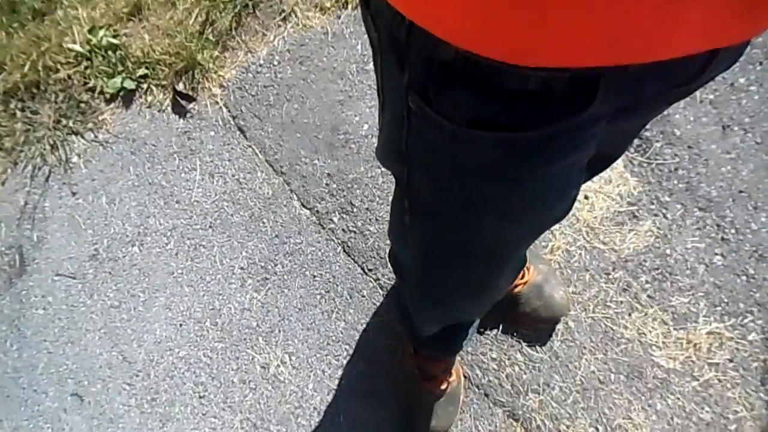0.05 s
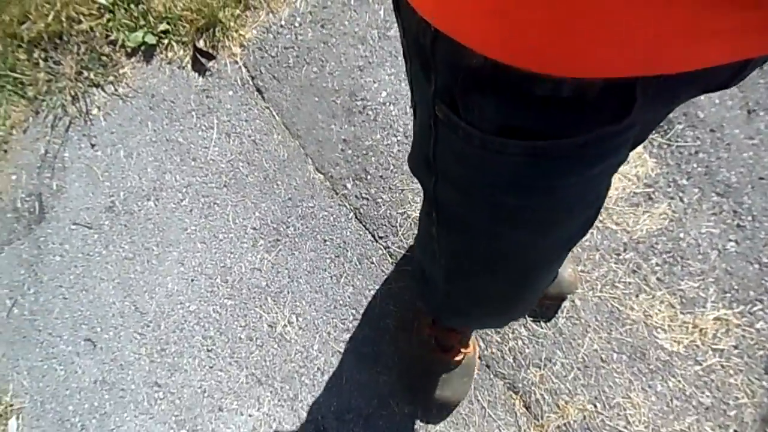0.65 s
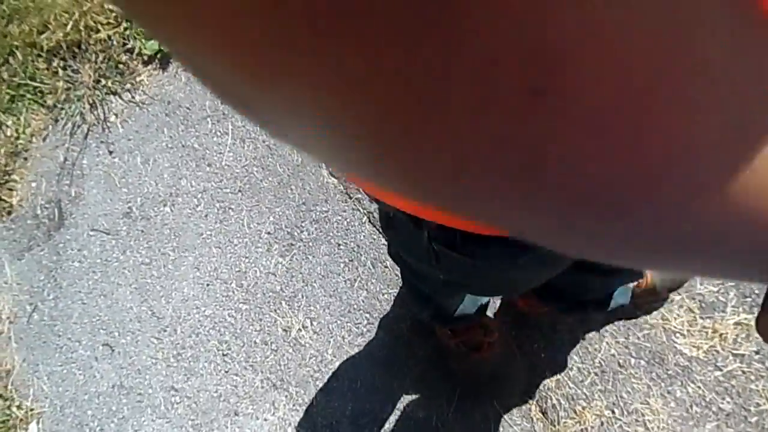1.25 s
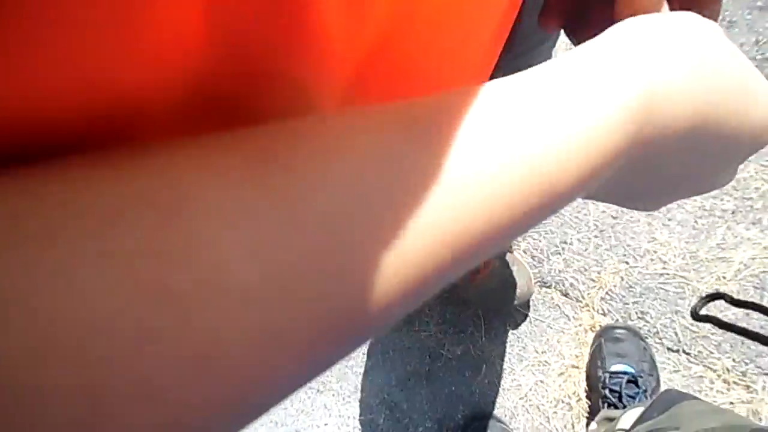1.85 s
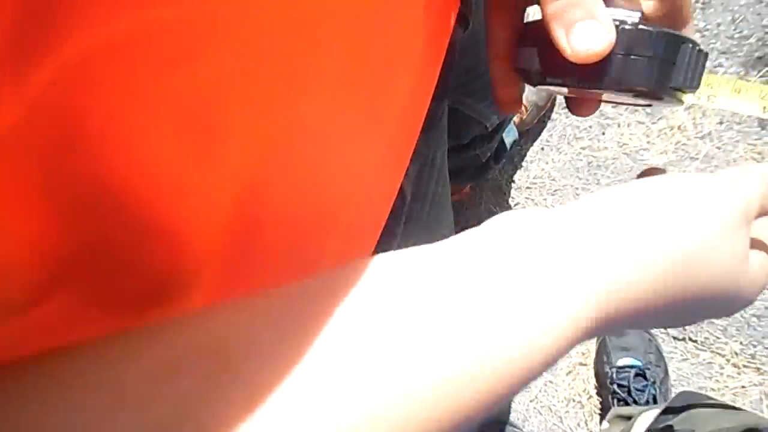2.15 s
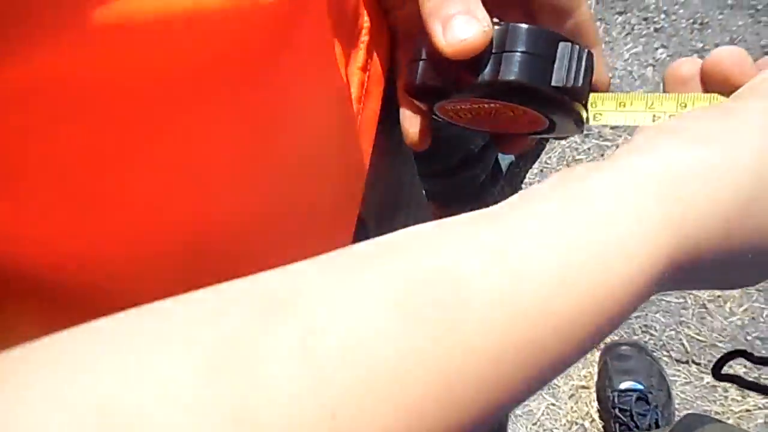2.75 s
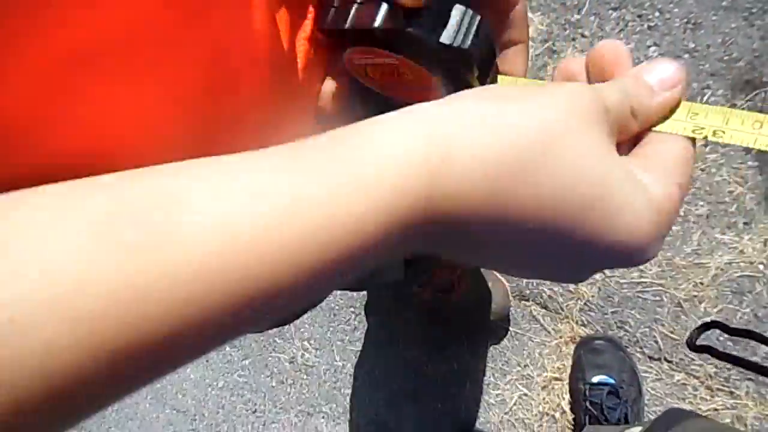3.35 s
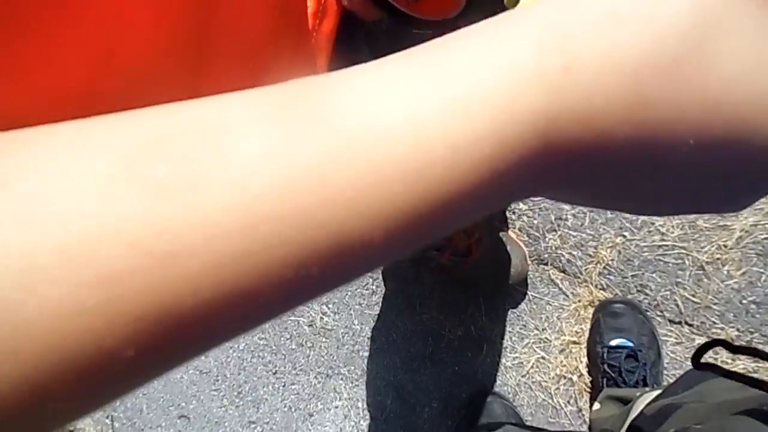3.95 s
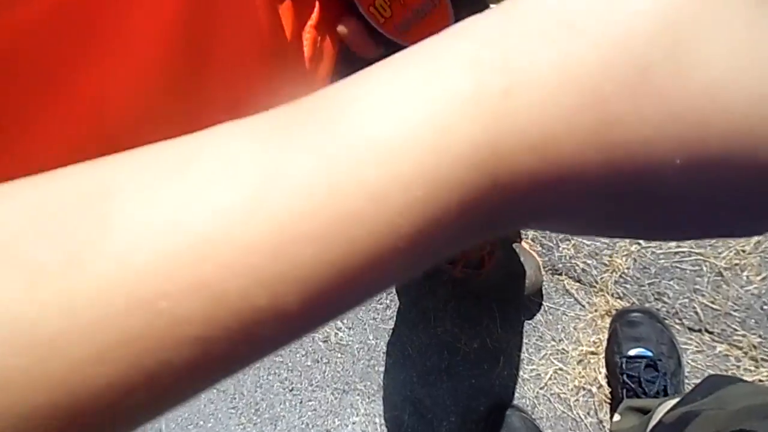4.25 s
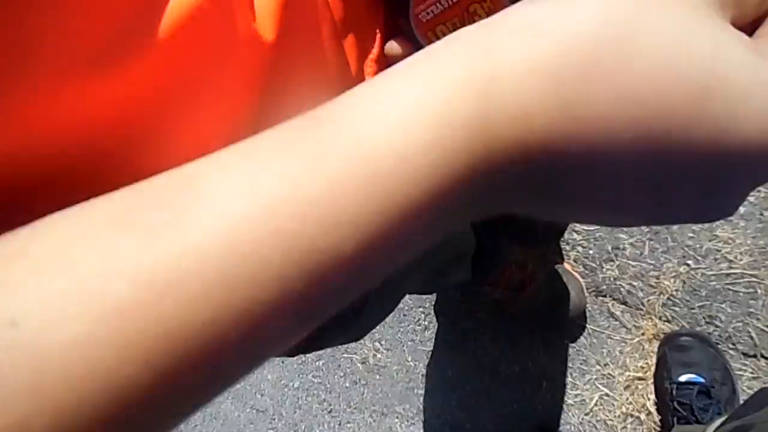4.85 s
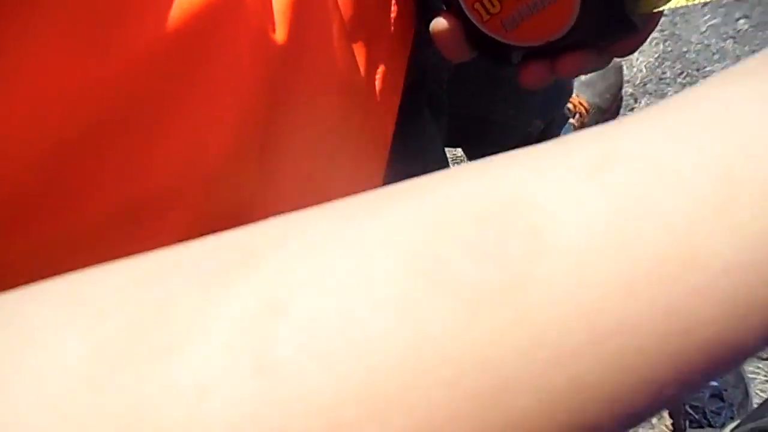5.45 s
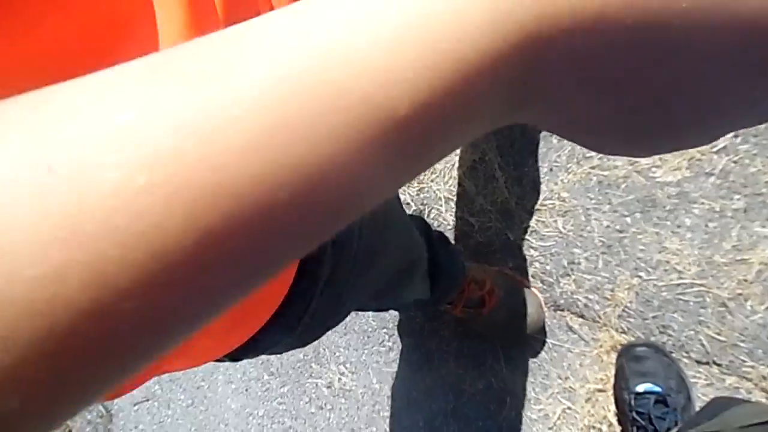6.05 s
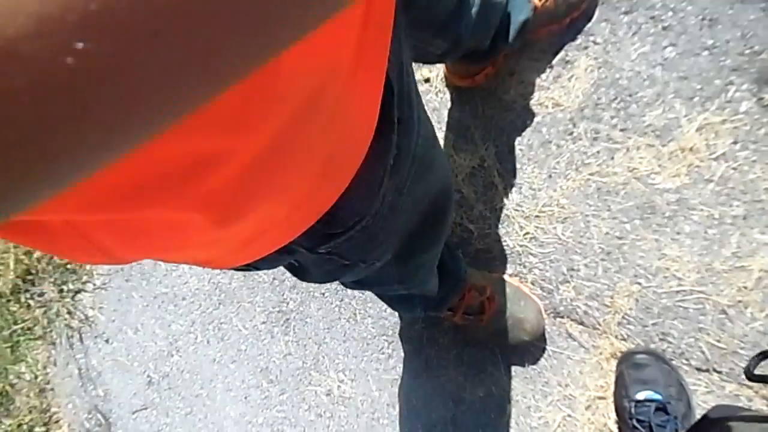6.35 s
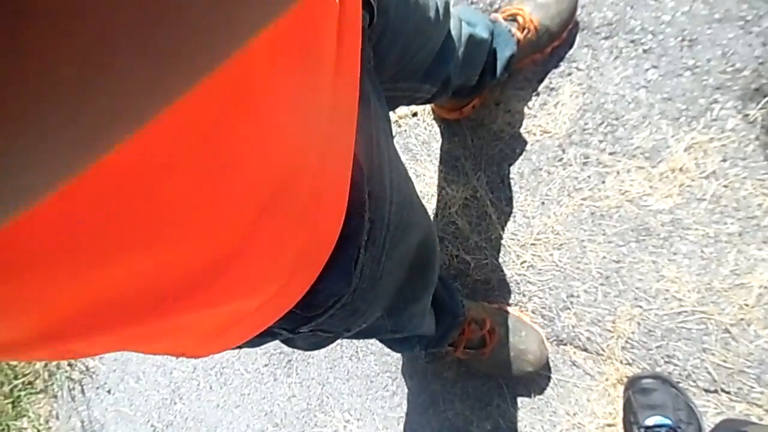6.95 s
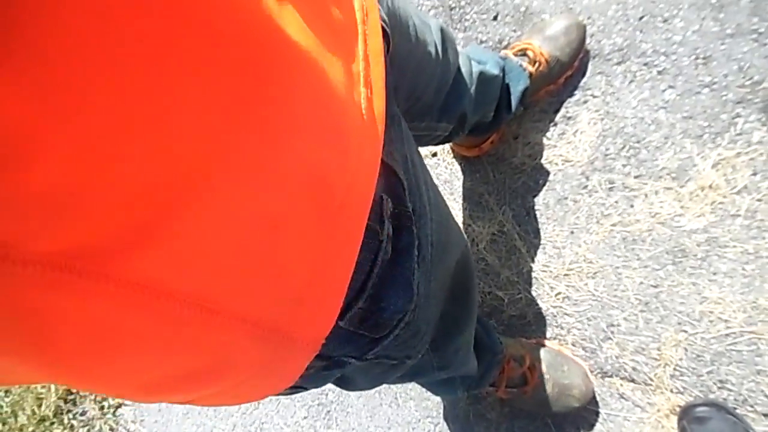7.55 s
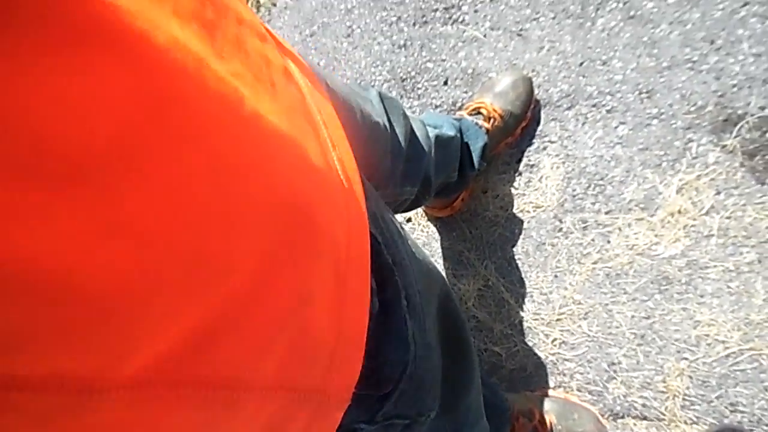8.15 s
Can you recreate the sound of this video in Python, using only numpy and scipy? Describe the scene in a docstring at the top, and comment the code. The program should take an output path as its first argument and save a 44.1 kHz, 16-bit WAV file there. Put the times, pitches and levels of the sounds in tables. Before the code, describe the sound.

A steel tape measure scrapes, rattles and clacks close by, with clothing rubbing the microphone and faint insects outdoors.

```python
"""A steel tape measure is pulled out in a summer garden, close to a body-worn microphone.
Katydids and a cricket rub their wings over a far machine hum. From 0.4 s the blade slides in
stick-slip strokes, scraping, ringing and crinkling; soon clothing rubs the microphone, a breeze
buffets it and its housing thuds. From 1.4 s the blade clacks against its case, in bouts to the end.
Near 6.5 s and 7 s a far bird whistles."""
import sys
import numpy as np
from scipy import signal
from scipy.fft import rfft, irfft
from scipy.io import wavfile

SR = 44100
rng = np.random.default_rng(int(sys.argv[2]) if len(sys.argv) > 2 else 0)


def inscribe(sig):
    """Save sig as 16-bit PCM at rate SR to the path in sys.argv[1].

    A 1-D sig is mono; a 2-D sig holds one channel per row.
    Samples are clipped to [-1, 1] before scaling.
    """
    pcm = np.round(np.clip(np.atleast_2d(sig).T, -1, 1) * 32767)
    wavfile.write(sys.argv[1], SR, pcm.astype(np.int16))


N = 362061
TIME = np.arange(N) / SR


def undb(db):
    """Decibels to gain."""
    return np.exp(np.asarray(db) * (np.log(10) / 20))


def unit(x):
    """Scale to rms 1."""
    return x / np.sqrt(np.mean(x ** 2) + 1e-20)


def add(out, time_s, x):
    """Mix x in at time_s."""
    i = int(np.clip(time_s * SR, 0, N))
    out[i:i + len(x)] += x[:N - i]


def response(colour, size=1024):
    """Minimum-phase, unit-energy impulse response from (frequency [Hz], level [dB]) rows."""
    hz, db = np.transpose(colour)
    bins_hz = np.maximum(np.arange(size // 2 + 1) * SR / size, 1)
    cepstrum = irfft(np.log(undb(np.interp(np.log(bins_hz), np.log(hz), db))))
    cepstrum[1:size // 2] *= 2
    cepstrum[size // 2 + 1:] = 0
    h = irfft(np.exp(rfft(cepstrum)))
    return h / np.linalg.norm(h)


def ring(x, h):
    """Drive a body of impulse response h with x."""
    return signal.oaconvolve(x, h)[:len(x)]


def band(x, hz, kind):
    """Butterworth low-, band- or high-pass."""
    return signal.sosfilt(signal.butter(4, hz, kind, fs=SR, output="sos"), x)


def noise(colour):
    """Steady coloured noise, rms 1."""
    return unit(ring(rng.standard_normal(N), response(colour, size=8192)))


def walk(rate_hz):
    """Smooth random wander, spread near 1."""
    return np.interp(TIME * min(rate_hz, 900), np.arange(8192), rng.standard_normal(8192))


def phase_of(hz):
    """Running phase [rad] of a varying frequency."""
    return 2 * np.pi * np.cumsum(hz) / SR


def slips(rate_hz, spread_db):
    """Stick-slip impulses: many weak, a few strong."""
    fired = rng.random(N) < rate_hz / SR
    size = undb(spread_db * np.minimum(rng.exponential(size=N), 4))
    return unit(fired * size * rng.choice([-1, 1], N))


def swell(peak_s, length_s, rise=.47, roundness=1.7):
    """Envelope of one movement: rounded peak, steep ends."""
    u = (TIME - peak_s) / length_s
    away = np.minimum(np.maximum(-u / rise, u / (1 - rise)), 2)
    return undb(-20 * away ** roundness - 2 * away ** 10)


def movements(rows, column=2):
    """Power sum of a table's swells, levels from one dB column."""
    return np.sqrt(sum((undb(row[column]) * swell(row[0], row[1])) ** 2 for row in rows))


# open-air spectrum: (frequency [Hz], level [dB])
AIR_COLOUR = [(30, 10), (100, 0.5), (190, -7.5), (400, -4.5), (520, -3), (780, -12), (1100, -11.5),
              (2000, -17.5), (5000, -14), (9500, -15), (15000, -28.5)]
def air(level_db=-5):
    """Open air: broad noise, slowly wavering."""
    return undb(level_db + walk(6)) * noise(AIR_COLOUR)


# distant insect band: (low edge [Hz], high edge [Hz])
CHORUS_BAND_HZ = [6370, 8240]
def chorus(level_db=-4):
    """Distant insects blur into a flickering hiss."""
    return undb(level_db + 1.4 * walk(100)) * unit(band(rng.standard_normal(N), CHORUS_BAND_HZ, "bandpass"))


def katydid(start_hz=8100, end_hz=6100, stroke_s=.022, cycle_s=.11, snap=.76):
    """Wing strokes in uneven threes; each falls in pitch and peaks near its end."""
    rasp_hz = 260 * walk(900)
    out, u = np.zeros(N), np.arange(0, 1, 1 / (stroke_s * SR))
    shape = np.sqrt(np.sin(np.pi * u)) * (1 - snap + snap * np.exp(-((u - .88) / .054) ** 2))
    starts_s = (np.arange(84)[:, None] + [0, .42, .76]).ravel() * cycle_s
    for time_s, (late, sharp, loud) in zip(starts_s, rng.standard_normal((len(starts_s), 3))):
        hz = (start_hz + (end_hz - start_hz) * u) * (1 + .007 * sharp)
        hz += rasp_hz[int(time_s * SR) % (N // 2):][:len(u)]
        add(out, time_s + .0024 * late, undb(2 * loud) * shape * np.sin(phase_of(hz)))
    return unit(out)


def hum(hz=123.3, level_db=-15):
    """A far machine drones: wavering fundamental plus third harmonic."""
    phase = phase_of(hz * (1 + walk(10) / 100))
    return undb(level_db + 2 * walk(10)) * (np.sin(phase) + .5 * np.sin(3 * phase))


# dry ticks of case and blade: (time [s], level [dB], pitch [Hz])
CREAKS = [(0.012, -40.5, 4000), (.045, -39, 3970), (1.266, -30.5, 5240), (2.592, -20.5, 6540),
          (2.879, -28, 7200), (3.076, -39, 4500), (3.188, -37, 2720), (3.269, -42, 4500),
          (3.466, -40, 3010), (3.643, -31.5, 6070), (3.711, -34.5, 8500), (4.916, -26, 5500),
          (5.192, -40.5, 5540), (5.293, -47, 4200), (5.757, -34, 2590), (5.766, -24.5, 2750),
          (5.859, -31, 2800), (6.525, -46.5, 2450), (7.127, -36.5, 3960), (7.151, -27.5, 9450)]
def creaks(decay_cycles=6):
    """Case and blade creak in the hand: a contact slips once and rings briefly."""
    out, t = np.zeros(N), TIME[:1024]
    for time_s, level_db, hz in CREAKS:
        body = response([(hz / 6, -16), (hz / 2, -9), (hz, 0), (hz * 2, -11), (hz * 5, -28)])
        fade = np.exp(-t * hz / decay_cycles)
        tick = ring(fade * rng.standard_normal(len(t)), body)
        add(out, time_s, undb(level_db) * 2 * tick * np.linalg.norm(fade) / np.linalg.norm(tick))
    return out


# cricket pace: (start [s], chirp period [s])
CRICKET_PACE = [(.19, .222), (2.6, .251), (4.3, .226), (5.45, .262), (6.25, .229)]
def cricket(hz=8650, waver_hz=120, pulse_hz=135, chirp_s=.06):
    """Eight-pulse chirps on one high note, about four a second."""
    gate, t = np.zeros(N), TIME[:int(chirp_s * SR)]
    chirp = np.sqrt(np.sin(np.pi * t / chirp_s)) * np.sin(np.pi * pulse_hz * t) ** 2
    time_s = CRICKET_PACE[0][0]
    while time_s < N / SR:
        add(gate, time_s, undb(rng.standard_normal()) * chirp)
        time_s += [period_s for start_s, period_s in CRICKET_PACE if start_s <= time_s][-1]
    return gate * np.sin(phase_of(hz + waver_hz * walk(480)))


# blade strokes: (peak time [s], length [s], flex level [dB], edge level [dB])
BLADE_STROKES = [(.515, 0.22, -60.5, -55), (.76, 0.27, -61, -62), (1.08, 0.39, -46, -45.5),
                 (1.28, 0.73, -42, -38), (1.465, 0.078, -25, -26.5), (1.52, 0.19, -38, -34),
                 (1.74, 0.19, -41.5, -63), (1.83, 0.18, -47.5, -32), (1.95, 0.044, -51, -34.5),
                 (2.3, 0.1, -43.5, -36), (2.49, 0.091, -39, -35), (2.615, 0.13, -33.5, -31),
                 (2.89, 0.11, -36.5, -29), (3.24, 0.17, -41.5, -37.5), (3.372, 0.046, -24, -37),
                 (3.53, 0.21, -46, -43), (3.76, 0.024, -56, -41), (4.66, 0.22, -49, -55),
                 (4.88, 0.11, -33, -42), (4.981, 0.058, -48, -41), (5.18, 0.15, -56, -61),
                 (5.41, 0.2, -41.5, -43), (5.665, 0.19, -32, -35), (5.713, 0.029, -34, -26.5),
                 (5.895, 0.089, -31, -50), (6.005, 0.045, -35.5, -30), (6.13, 0.048, -49.5, -50.5),
                 (6.82, 0.15, -56, -50.5), (7.03, 0.083, -85, -47), (7.16, 0.086, -39, -41),
                 (7.3, 0.28, -28, -40), (7.41, 0.12, -53, -26), (7.51, 0.32, -41, -36.5),
                 (7.66, 0.41, -54, -43), (8.01, 0.47, -40.5, -42), (8.13, 0.033, -26, -14.5),
                 (8.166, 0.087, -34.5, -29)]
def blade_motion(column, quiver_db=-25):
    """Blade drive envelope: strokes plus the quiver after each clack."""
    power = movements(BLADE_STROKES, column) ** 2
    for row in CASE_CLACKS:
        quiver = np.exp(-np.log(1000) * TIME[:SR // 2] / grip_t60(row[0]))
        add(power, row[0], (undb(row[column] + quiver_db) * quiver) ** 2)
    return np.sqrt(power)


# clusters of close blade modes: (centre [Hz], width [Hz], level [dB])
BLADE_MODES = [(3380, 520, -2.5), (3670, 310, -8), (5910, 3800, -2), (8630, 1800, 2.5)]
def steel(colour, tail_db, t60_s=.06, count=14):
    """Thin blade's impulse response: dry tick, then ringing; each bend shifts the colour."""
    t, bend = TIME[:SR // 8], rng.uniform(.93, 1.07)
    modes = np.zeros(len(t))
    for hz, width_hz, db in BLADE_MODES:
        partials_hz = hz + width_hz * rng.uniform(-.54, .5, (count, 1))
        modes += undb(db) * np.sin(2 * np.pi * (partials_hz * t + rng.random((count, 1)))).sum(axis=0)
    modes *= np.exp(-np.log(1000) * t / t60_s)
    h = undb(tail_db) * modes / np.linalg.norm(modes)
    h[0] += 1
    return ring(h, response([(hz * bend, db) for hz, db in colour]))


# friction unevenness: (time [s], spread [dB])
FRICTION_SPREAD = [(1.9, 1.9), (2.5, 3.1)]
def jerkiness():
    """Friction spread [dB]: the blade first glides, then catches."""
    return np.interp(TIME, *np.transpose(FRICTION_SPREAD))


def reflections(x, count=3, hold_s=.04, longest_s=.004, echo_gain=.4):
    """Slips echo along the blade off fingers and case; delays change as the hand shifts."""
    out, hop, size = np.zeros(N), int(hold_s * SR), int(longest_s * SR)
    window = np.sin(np.pi * np.arange(2 * hop) / (2 * hop))
    for i in range(0, N, hop):
        h = np.zeros(size)
        h[0] = 1
        h[rng.integers(10, size, count)] = echo_gain * rng.choice([-1, 1], count)
        piece = x[i:i + 2 * hop]
        add(out, i / SR, signal.fftconvolve(piece * window[:len(piece)], h))
    return unit(out)


# sliding blade spectrum: (frequency [Hz], level [dB])
SCRAPE_COLOUR = [(500, -21.5), (1400, -18.5), (2300, -16.5), (3200, -12), (4600, -11), (6000, -12),
                 (8000, -1), (9500, 1.5), (11000, -3), (13000, -8.5), (15500, -13)]
def scrape(flex, edge, edge_db=-2, split_hz=6300):
    """The blade jerks through case mouth and fingers; each slip rings it."""
    jerk_db = jerkiness()
    friction = slips(rate_hz=2500, spread_db=4.5) * undb(jerk_db * walk(110))
    # the wandering contact point favours different bands
    bounds_hz = np.geomspace(900, 16500, 13)
    drifts = [undb(2.5 * walk(14)) for _ in bounds_hz[1:]]
    friction = sum(band(friction, [lo, hi], "bandpass") * drift * undb(jerk_db * walk(130))
                   for lo, hi, drift in zip(bounds_hz, bounds_hz[1:], drifts))
    friction = reflections(friction)
    drive = flex * unit(band(friction, split_hz, "lowpass"))
    drive += undb(edge_db) * edge * unit(band(friction, split_hz, "highpass"))
    out, hold = np.zeros(N), SR // 4
    for i in range(0, N, hold):  # the close modes change with the grip
        add(out, i / SR, signal.fftconvolve(drive[i:i + hold], steel(SCRAPE_COLOUR, tail_db=-17.5)))
    return out


# grips, each freeing another blade length: (start [s], pitch [Hz], level re flex [dB], t60 [s])
BLADE_GRIPS = [(0, 2953, 8, .2), (.68, 3867, -6, 0.14), (5.55, 3130, -8, 0.14), (7.45, 3735, -3.5, 0.26)]
# free blade's bending modes: (pitch multiple [-], level [dB])
BENDING_MODES = [(.63, -16), (1, -5), (1.44, -9.5)]
def singing(flex, width_hz=170, rough_db=2, wander=.022):
    """Slips keep the bending modes ringing, fitfully and at wavering pitch."""
    fade, out = np.exp(-np.pi * width_hz * TIME[:SR // 16]), 0
    start_s, hz, grip_db, _ = np.transpose(BLADE_GRIPS)
    grip = np.maximum(np.searchsorted(start_s, TIME) - 1, 0)
    for ratio, db in BENDING_MODES:
        phase = phase_of(ratio * hz[grip] * (1 + wander * walk(20)))
        mode = sum(ring(slips(rate_hz=1100, spread_db=1.5), fade) * wave(phase)
                   for wave in (np.sin, np.cos))
        out += undb(db) * unit(mode * undb(rough_db * walk(20)))
    return out * undb(grip_db[grip]) * flex


def grip_t60(time_s):
    """Ring time [s] that the current grip allows."""
    return [t60_s for start_s, _, _, t60_s in BLADE_GRIPS if start_s <= time_s][-1]


def crinkles(flex, edge, rate_hz=150, decay_s=.001, grit=.12, gain=2.506):
    """The moving curved blade snaps in tiny buckles, each at its own pitch."""
    out, t = np.zeros(N), TIME[:600]
    for when, height, size, offset in rng.random((int(rate_hz * N / SR), 4)):
        hz, i = 2900 * 4 ** height, int(when * N)
        motion = flex[i] ** (1 - height) * edge[i] ** height
        cycles = hz * t + offset + grit * np.cumsum(rng.standard_normal(len(t)))
        add(out, i / SR, size ** 2 * motion * np.exp(-t / decay_s) * np.sin(2 * np.pi * cycles))
    return gain * band(out, 1800, "highpass") * jerkiness()


# microphone housing spectrum: (frequency [Hz], level [dB])
HOUSING_COLOUR = [(90, -5), (380, 3.5), (1050, -6), (1600, -16.5), (3000, -31.5)]
# cloth rubs: (peak time [s], length [s], swish level [dB], hollow level [dB])
CLOTH_RUBS = [(.795, 0.047, -60, -55.5), (1.36, 0.55, -46, -47), (4.87, 0.15, -47, -45.5),
              (5.68, 0.19, -48.5, -46), (5.9, 0.34, -51, -53.5), (7.31, 0.39, -45, -43.5)]
def clothing(hollow_hz=740, width_hz=150, wander=.13, jerk_db=3):
    """Cloth swishes over the housing and rings its hollow, shifting the note as it covers it."""
    friction = slips(rate_hz=2000, spread_db=2) * undb(jerk_db * walk(70))
    swish = unit(ring(friction, response(HOUSING_COLOUR)))
    carrier = np.exp(1j * phase_of(hollow_hz * np.exp(wander * walk(40))))
    fade = np.exp(-np.pi * width_hz * TIME[:SR // 10])
    hollow = unit(np.real(ring(friction * carrier.conj(), fade) * carrier))  # moving resonance
    return swish * movements(CLOTH_RUBS) + hollow * movements(CLOTH_RUBS, column=3)


# wind buffet spectrum: (frequency [Hz], level [dB])
BUFFET_COLOUR = [(12, -5), (25, 4.5), (55, -5), (100, -19), (200, -35), (600, -56.5)]
# puffs of air: (peak time [s], length [s], level [dB])
PUFFS = [(1.29, 0.69, -35.5), (2.65, 0.56, -40), (3.42, 0.6, -37.5), (6.27, 0.65, -52), (7.37, 0.52, -36)]
def breeze(calm_db=-73):
    """Air buffets the microphone: low puffs over a faint draught."""
    flutter = undb(4 * walk(16))
    return unit(noise(BUFFET_COLOUR) * flutter) * (movements(PUFFS) + undb(calm_db))


# housing thuds: (time [s], pitch [Hz], level [dB])
HOUSING_BUMPS = [(1.181, 408, -31), (1.298, 690, -29), (1.419, 734, -35.5), (1.474, 765, -31),
                 (4.874, 713, -28.5), (5.700, 700, -27), (5.721, 745, -28), (5.842, 470, -36.5),
                 (5.894, 520, -32), (7.254, 743, -27.5), (7.425, 697, -28.5)]
def bumps(note_db=-3.5, knock_db=-6, decay_s=.0033, sag_per_s=8):
    """The housing thuds: a dull knock with a short sagging note."""
    out, t = np.zeros(N), TIME[:SR // 16]
    contact = t / decay_s * np.exp(1 - t / decay_s)
    for time_s, hz, level_db in HOUSING_BUMPS:
        body = response([(hz / 4, -10), (hz, 0), (hz * 2, -10), (hz * 6, -40)])
        knock = undb(knock_db) * unit(ring(rng.standard_normal(len(t)), body))
        note = undb(note_db) * np.sin(phase_of(hz * np.exp(-sag_per_s * (t - decay_s))))
        add(out, time_s - decay_s / 2, undb(level_db) * contact * (note + knock))
    return out


# struck blade spectrum: (frequency [Hz], level [dB])
CLACK_COLOUR = [(150, -32.5), (700, -11), (1300, -18.5), (2200, -13.5), (3100, -5.5), (4000, -4),
                (5500, -4.5), (6800, -0.5), (8700, 10), (10200, 2), (11700, -0.5), (15500, -7.5)]
# blade hits case: (time [s], chatter [ms], flex level [dB], edge level [dB], main ring [Hz])
CASE_CLACKS = [(1.4423, 4.6, -19.5, -12.5, 2900), (1.717, 2.1, -26, -35, 2900),
               (1.7381, 0.48, -24.5, -50, 2620), (2.521, 2.9, -23, -24.5, 5050),
               (2.573, 3.3, -25, -29.5, 4260), (2.604, 1, -21, -33, 4130), (2.6254, 1.4, -24, -35, 6460),
               (2.852, 1.7, -26, -22, 6300), (2.935, 1.4, -15.5, -9, 4180), (2.96, 1.0, -41, -23, 5550),
               (3.035, 1.8, -28.5, -30, 5070), (3.229, 3.6, -27.5, -32.5, 4970),
               (3.368, 1.45, -17, -13, 5940), (3.43, 0.84, -26, -17.5, 6250),
               (3.9864, 0.58, -20, -26, 6200), (3.991, 3.3, -39.5, -26.5, 4080),
               (4.884, 0.94, -9.5, -15.5, 5680), (4.9039, 2.9, -4, -10, 5630),
               (5.6977, 1.25, -16, -25, 6100), (5.8337, 0.81, -11, -29.5, 5130),
               (5.9171, 0.31, -20, -19, 6100), (5.9345, 0.17, -6, -12.5, 5940),
               (5.9646, 1, -21, -24.5, 5700), (5.97, 1.06, -9.5, -9.5, 4600),
               (6.0034, 1, -26.5, -22.5, 6150), (7.348, 1.6, -33, -29, 5200), (7.3636, 1.1, -24, -25, 5350),
               (7.406, 4.1, -15.5, -12.5, 2630), (7.4265, 1.1, -14.5, -23, 2650),
               (8.0564, 4.4, -18, -15.5, 6060), (8.1142, 3.5, -10.5, -7, 5030)]
def clacks(graze_s=.0076, graze_db=-23.5, thud_db=-19, main_db=-5, main_width_hz=550):
    """The blade grazes the case, then chatters on it: case thud, bending, edges, one lasting mode."""
    low_hz, high_hz = 1800, 6500
    sing_hz, sing_db, flex_cap_db = 3800, -20, -24
    out, t = np.zeros(N), TIME[:SR // 4]
    graze = undb(graze_db) * (t < graze_s) * t / graze_s
    for time_s, chatter_ms, flex_db, edge_db, main_hz in CASE_CLACKS:
        u = np.maximum(t - graze_s, 0) / (max(chatter_ms, .2) / 1000)
        contact = np.sqrt(u) * np.exp((1 - u ** 2) / 4) + graze
        hit = ring(contact * rng.laplace(size=len(t)), steel(CLACK_COLOUR, tail_db=-17, count=30))
        main = ring(hit, np.exp(-np.pi * main_width_hz * t) * np.cos(2 * np.pi * main_hz * t))
        bending = unit(band(hit, [low_hz, high_hz], "bandpass"))
        bending += undb(main_db) * unit(band(main, [low_hz, high_hz], "bandpass"))
        thud, edges = band(hit, low_hz, "lowpass"), band(hit, high_hz, "highpass")
        for part, db in (thud, flex_db + thud_db), (bending, flex_db), (edges, edge_db):
            add(out, time_s - graze_s, undb(db) * np.linalg.norm(contact) * part / np.linalg.norm(part))
        sing = np.exp(-np.log(1000) * t / grip_t60(time_s)) * np.sin(2 * np.pi * sing_hz * t)
        add(out, time_s, undb(min(flex_db, flex_cap_db) + sing_db) * sing)
    return out


# far whistles: (time [s], length [s], start pitch [Hz], end pitch [Hz], level re garden [dB])
BIRD_WHISTLES = [(6.472, 0.2, 4590, 4450, -14), (6.955, 0.062, 4550, 3100, -6)]
def bird():
    """Thin wavering whistles, near level or falling."""
    out, waver_hz = np.zeros(N), 80 * walk(400)
    for time_s, length_s, start_hz, end_hz, db in BIRD_WHISTLES:
        u = np.arange(0, 1, 1 / (length_s * SR))
        hz = start_hz + (end_hz - start_hz) * u ** 1.4 + waver_hz[:len(u)]
        add(out, time_s, undb(db) * np.sqrt(np.sin(np.pi * u)) * np.sin(phase_of(hz)))
    return out * undb(2 * walk(90))


# outdoor background: (time [s], level [dB])
GARDEN_LEVEL = [(.3, -65), (.85, -59.5), (1.3, -46.5), (2.75, -38), (3.14, -44.5), (4.45, -58), (4.77, -46),
                (5.24, -59.5), (5.8, -42), (6.28, -68), (6.7, -60), (7.1, -54.5), (7.6, -46)]
def garden(cricket_db=4.5, katydid_db=-7):
    """Air, insects, bird and hum, all relative to one rising and falling level."""
    bed = air() + chorus()
    insects = undb(cricket_db) * cricket() + undb(katydid_db) * katydid()
    return (bed + insects + bird() + hum()) * undb(np.interp(TIME, *np.transpose(GARDEN_LEVEL)))


def scene():
    """Tape measure close by, noise on the microphone, garden behind; mono."""
    flex, edge = blade_motion(column=2), blade_motion(column=3)
    tape = clacks() + scrape(flex, edge) + singing(flex) + crinkles(flex, edge) + creaks()
    return (tape + clothing() + bumps() + breeze() + garden())[None]


def record(dry):
    """The hardest knocks clip the input; steep low-pass at 16 kHz."""
    lowpass = signal.ellip(10, .2, 70, 16000, fs=SR, output="sos")
    return signal.sosfilt(lowpass, np.clip(dry, -1, 1))


dry = scene()
out = record(dry)
inscribe(out)
```